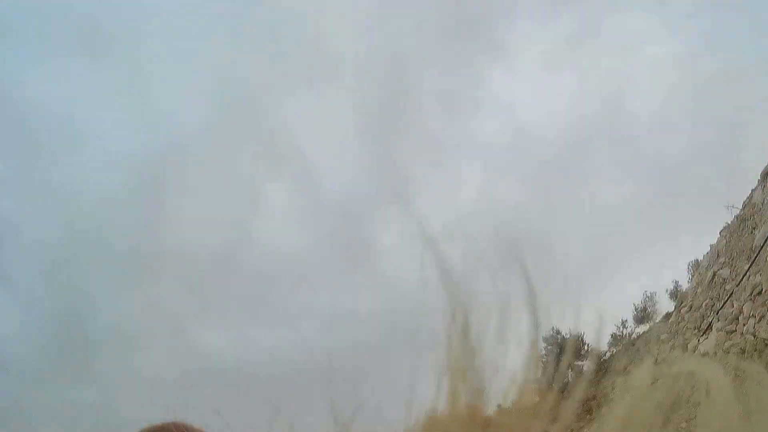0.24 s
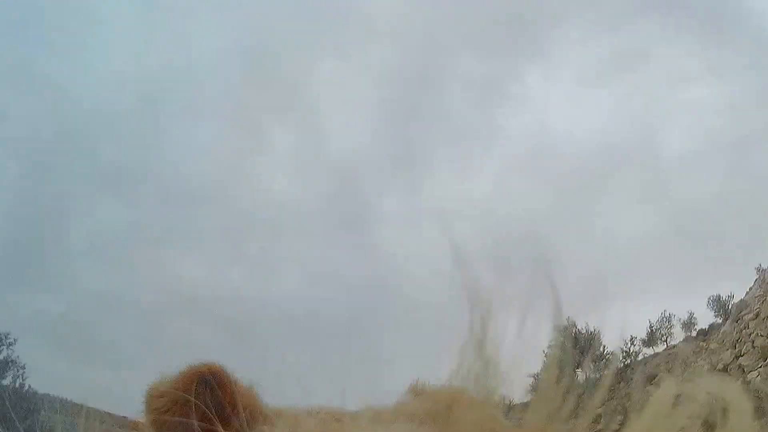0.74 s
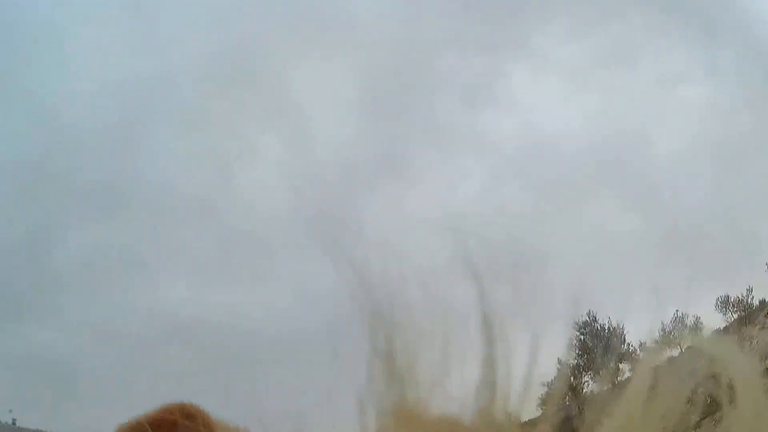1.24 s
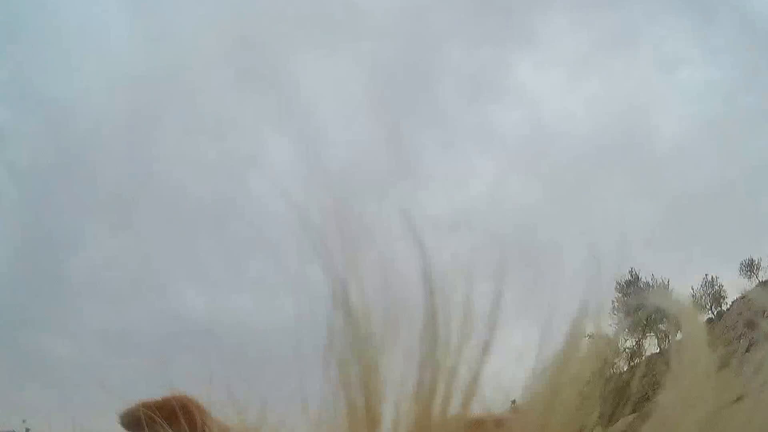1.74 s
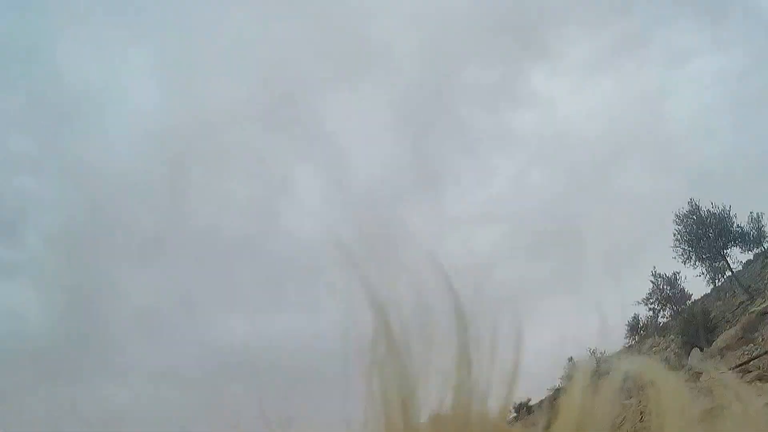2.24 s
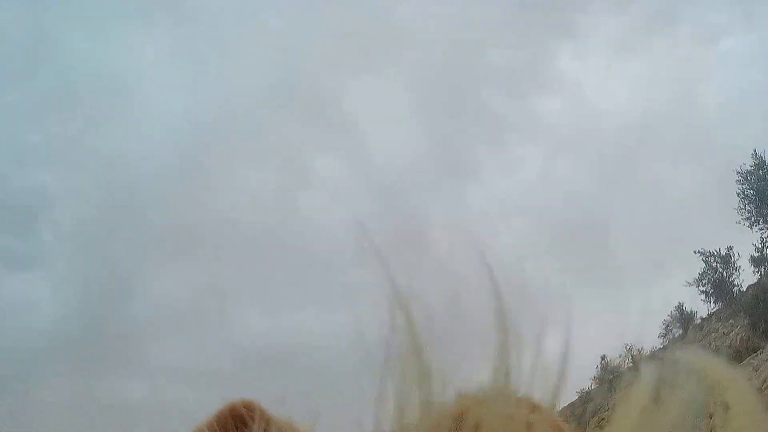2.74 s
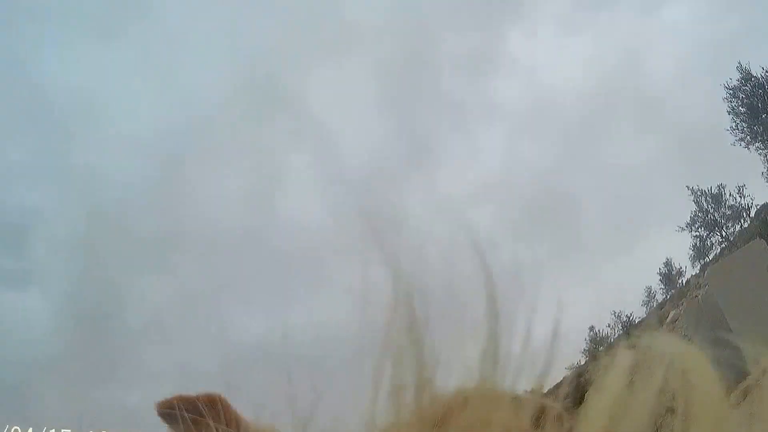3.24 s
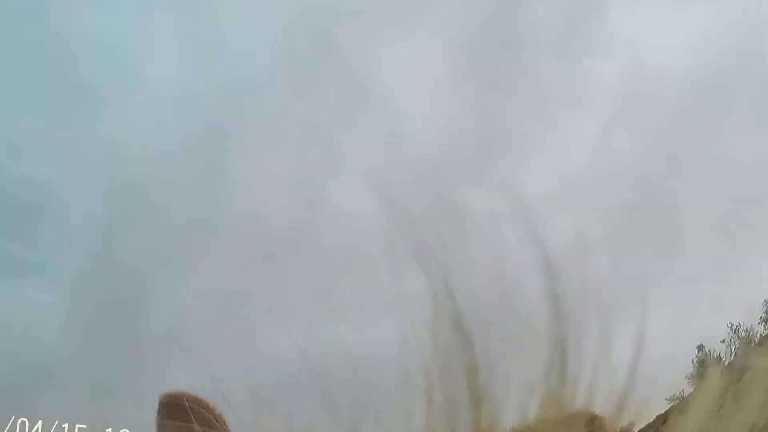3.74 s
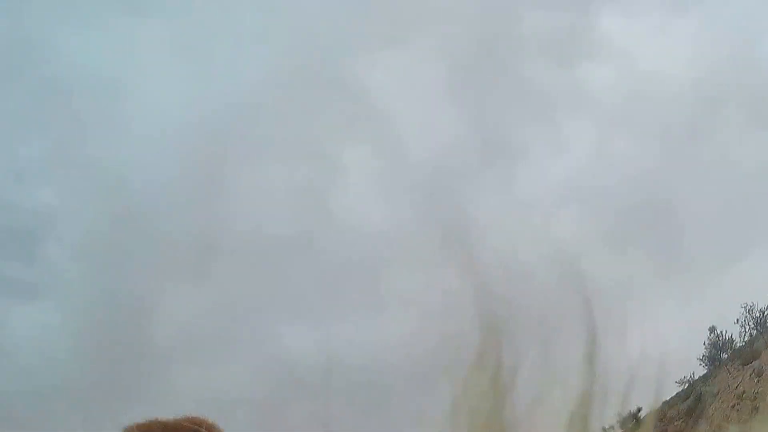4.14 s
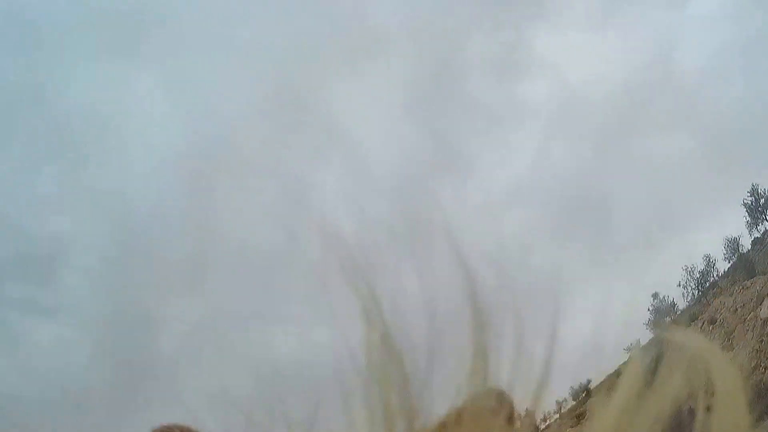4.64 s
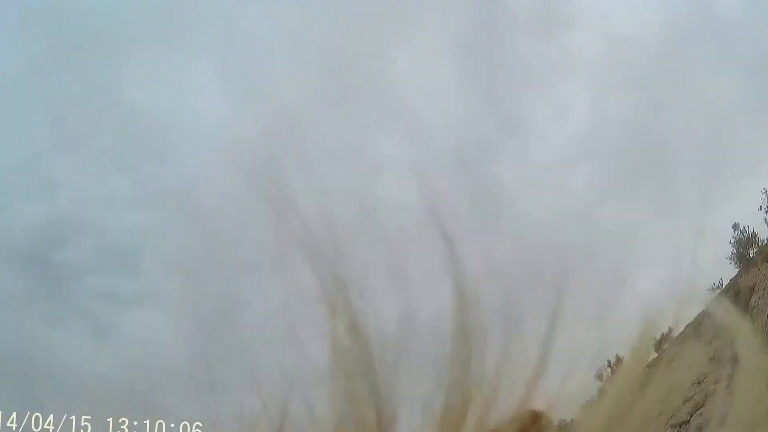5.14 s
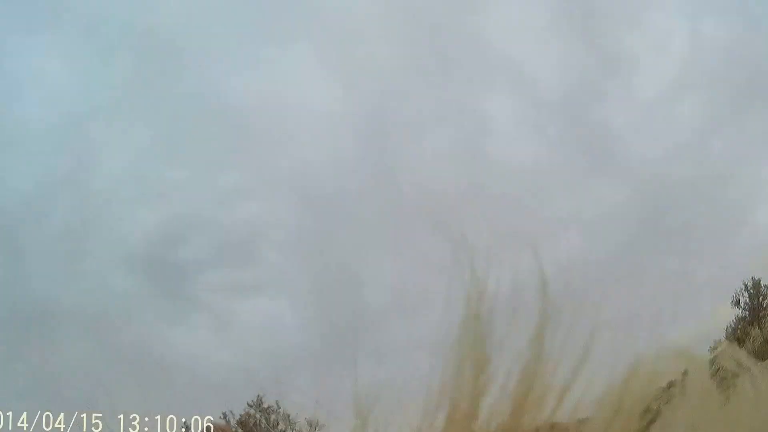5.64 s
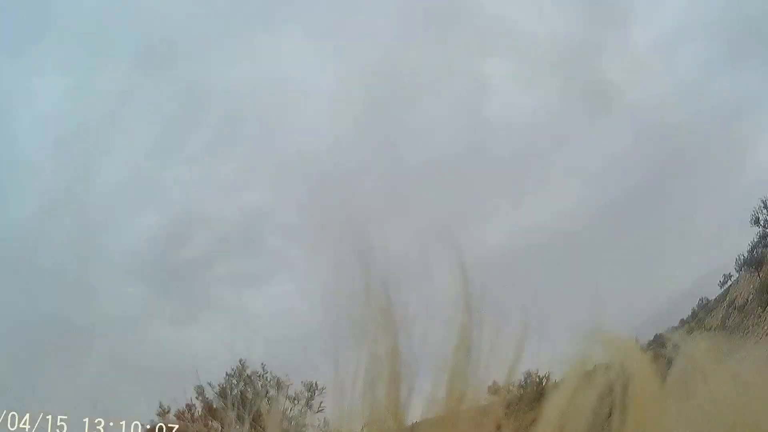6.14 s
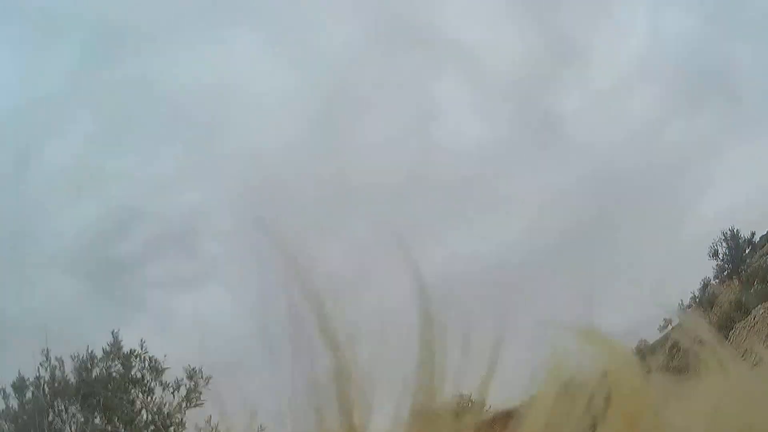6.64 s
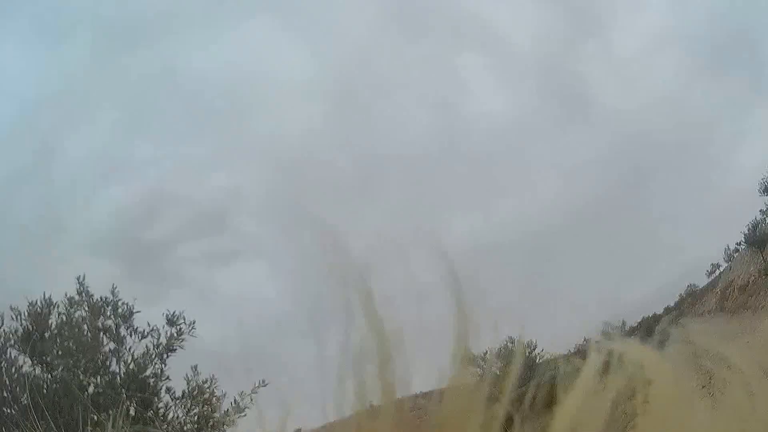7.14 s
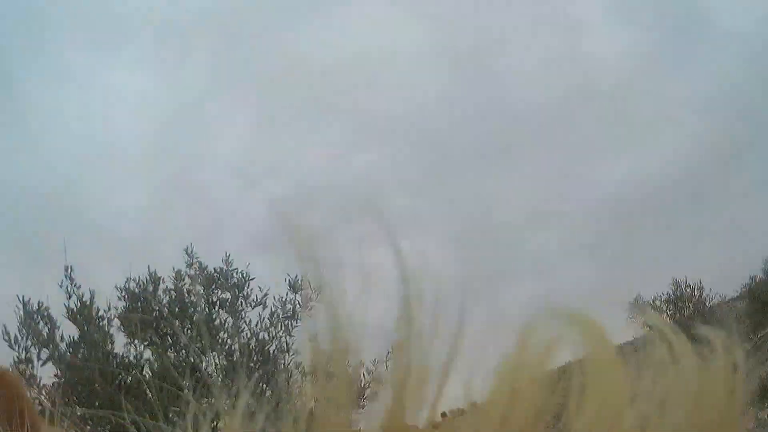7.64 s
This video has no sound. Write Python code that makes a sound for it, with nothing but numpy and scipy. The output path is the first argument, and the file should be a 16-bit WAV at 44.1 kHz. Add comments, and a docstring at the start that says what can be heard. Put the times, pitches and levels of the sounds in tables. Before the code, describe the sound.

Steady muffled thumps and scratchy swishes of fur and dry grass follow a dog's trot, slowing and softening near the end over faint hiss.

```python
"""A jolt, a knock and a swish of dry grass land together, then repeat with each stride of a trotting dog.
A small camera in a closed housing rides on its back: short swings make the jolts, ringing bursts the knocks,
swells of scratchy noise the grass and fur, and slow swings the sway; resonances of the housing colour
the rustle and knocks. Tiny ticks stand out, with low rumble, hiss, faint whine and thin tones behind."""
import sys
import numpy as np
from scipy import signal
from scipy.fft import rfft, irfft, next_fast_len
from scipy.io import wavfile
from scipy.ndimage import uniform_filter1d

SR = 44100
rng = np.random.default_rng(int(sys.argv[2]) if len(sys.argv) > 2 else 0)


def put_to_file(sound):
    """Save the sound as 16-bit audio at rate SR, in the file named by the first command-line argument."""
    columns = np.atleast_2d(sound).T  # one column per channel
    safe = np.clip(columns, -1, 1)
    whole_steps = np.round(safe * 32767)
    wavfile.write(sys.argv[1], SR, whole_steps.astype(np.int16))


N = 348390
SIZE = next_fast_len(N + SR // 2)  # padded for filtering
HZ = np.arange(SIZE // 2 + 1) * SR / SIZE + 1e-3  # just above zero, so logs stay finite
TIME = np.arange(N) / SR

# footfalls, the two diagonal leg pairs in turn: (peak time [s], swish level [dB], sway level [dB])
FOOTFALLS = [(0.041, -42.5, -38), (0.278, -44.5, -41), (.481, -41.5, -41), (0.718, -45.5, -40.5),
             (0.914, -39.5, -42.5), (1.157, -45, -37), (1.363, -41, -48), (1.588, -47, -45.5),
             (1.791, -39, -45), (2.033, -46.5, -45), (2.239, -41.5, -48), (2.468, -47, -43),
             (2.681, -45.5, -45.5), (2.908, -44, -46), (3.121, -41.5, -44.5), (3.366, -48, -43),
             (3.579, -44.5, -49), (3.811, -46.5, -44.5), (4.036, -42, -46.5), (4.281, -45.5, -41),
             (4.491, -43, -46), (4.737, -49.5, -43.5), (4.948, -46, -46), (5.197, -47.5, -40.5),
             (5.432, -45, -51), (5.673, -47, -50), (5.943, -48.5, -60), (6.205, -50, -54.5),
             (6.457, -46.5, -46), (6.728, -48.5, -46), (6.996, -48, -50), (7.249, -53.5, -50.5),
             (7.645, -56, -57)]
FIRST_GAP_S = .22  # time assumed before the first step
SWISH_PRESS = 0.85  # higher = flatter top
# per leg pair: rise and fall as shares of the time since the last step, treble under the swish
SWISH_RISE, SWISH_FALL = (0.1, 0.11), (0.099, .09)
SWISH_TREBLE_DB = (-11, -13.5)
# stray tufts brushing past: (peak time [s], level [dB], treble relative to it [dB])
TUFTS = [(.385, -54, -24), (.613, -55, -8), (.835, -61, -18), (1.049, -62, -8), (1.48, -58.5, -8),
         (1.717, -54.5, -11), (2.368, -60, -13), (3.03, -52, -18), (3.263, -51.5, -16), (4.408, -55.5, -11),
         (4.87, -50.5, -10), (5.033, -61, -13), (6.316, -58, -15), (6.851, -50.5, -12), (7.085, -56, -8),
         (7.4, -58, -15)]
TUFT_RISE_S, TUFT_FALL_S = 0.026, 0.016
# rustle between the swishes, before its random wavering: (time [s], level [dB])
RUSTLE_BED = [(0.0, -53.5), (.35, -57), (.61, -53.5), (1.49, -53.5), (2.53, -54.5), (2.88, -62),
              (3.08, -55.5), (4.47, -55), (4.99, -58.5), (5.2, -56.5), (5.97, -56), (6.16, -68),
              (6.36, -54), (6.73, -66), (6.89, -54), (7.5, -74.5), (7.77, -61), (7.9, -76)]
BED_TREBLE_DB, USUAL_BED_DB = -12, -57
# housing resonances under the dull and the bright scratches: (frequency [Hz], width [Hz], level [dB])
HOUSING_DULL = [(266, 290, -3.5), (635, 207, 0), (888, 135, -4.5), (1014, 32, -4.5), (1145, 220, -7),
                (1355, 320, -0.5), (1617, 450, -1.5), (1884, 350, -2.5), (2370, 280, -14.5),
                (2570, 390, -12)]
HOUSING_BRIGHT = [(3314, 230, -3.5), (3638, 304, 2.5), (4084, 225, -1), (4270, 180, -6), (4740, 250, -9.5),
                  (5050, 360, -11), (5550, 790, -14), (5900, 5400, -22), (9400, 340, -20),
                  (11100, 7400, -26.5)]

# the mount jolts on the harness: (peak time [s], drive level [dB], swing before wobble [Hz])
MOUNT_JOLTS = [(.027, -35.5, 171), (0.043, -37.5, 151), (0.09, -45, 115), (0.267, -31, 127),
               (.406, -42, 152), (.462, -39, 181), (.707, -36, 123), (0.806, -44, 146), (.832, -38.5, 141),
               (.9, -34.5, 185), (0.919, -37.5, 187.4), (0.96, -44.5, 119), (1.15, -29, 134.3),
               (1.286, -38, 127.5), (1.347, -36.5, 207), (1.581, -32, 110), (1.718, -35.5, 161.7),
               (1.801, -34, 217), (1.845, -44, 144), (2.026, -35.5, 148.4), (2.109, -47, 200),
               (2.157, -45, 150), (2.236, -34.5, 143), (2.277, -38.5, 139), (2.47, -31.5, 128.4),
               (2.593, -45, 140), (2.687, -39.5, 129.6), (2.902, -30.5, 135.8), (3.037, -36.5, 143.3),
               (3.104, -37, 183), (3.124, -36.5, 181), (3.171, -39.5, 133), (3.356, -31.5, 133.3),
               (3.501, -50, 127), (3.565, -41, 140), (3.812, -36.5, 143.4), (3.949, -37.5, 152),
               (4.023, -32.5, 198), (4.077, -38, 152), (4.278, -33.5, 114), (4.418, -42.5, 130),
               (4.502, -35.5, 146), (4.722, -35, 124.4), (4.784, -42, 136), (4.81, -46, 136),
               (4.83, -43, 132), (4.874, -39.5, 165), (4.951, -36, 136), (5.009, -40, 108.4),
               (5.195, -41.5, 149), (5.323, -50, 119), (5.413, -45, 196.5), (5.437, -40, 179.5),
               (5.481, -36.5, 108.4), (5.799, -46, 116.5), (5.947, -34.5, 139), (6.217, -45, 136),
               (6.343, -50, 127.4), (6.365, -41.5, 127), (6.437, -43, 162), (6.47, -35.5, 141),
               (6.754, -38.5, 126.3), (6.886, -45, 145.5), (6.92, -45, 142), (6.996, -42, 199),
               (7.068, -43.5, 200)]
JOLT_RISE_S, JOLT_FALL_S = .006, 0.0066
# faint jolts at random moments
JIGGLE_PER_S, JIGGLE_DB, JIGGLE_SCATTER_DB, JIGGLE_HZ = 2.6, -56.5, 3, (124, 185)
JIGGLE_END_S, MAX_JIGGLES = 7.1, 40
# rattling straps: (frequency [Hz], width [Hz], level [dB])
STRAP_MODES = [(283, 79, 0.44), (133.5, 103, -1.4)]

# knocks on the housing wall: (peak time [s], level [dB])
WALL_KNOCKS = [(.03, -36.5), (.269, -44), (.402, -47), (.457, -41), (.618, -54), (.706, -44), (.832, -43.5),
               (.903, -37.5), (.97, -55), (1.143, -37), (1.18, -43.5), (1.282, -53), (1.344, -42),
               (1.369, -45), (1.582, -41), (1.712, -48.5), (1.77, -49), (1.784, -38.5), (1.947, -50),
               (2.024, -41.5), (2.105, -49), (2.218, -37.5), (2.469, -40), (2.666, -38), (2.895, -45.5),
               (2.945, -51), (3.034, -42), (3.105, -38), (3.359, -43.5), (3.56, -45), (3.58, -52),
               (3.811, -45), (3.951, -47), (4.007, -43.5), (4.025, -37), (4.279, -43.5), (4.413, -47),
               (4.484, -36), (4.502, -45), (4.52, -45.5), (4.723, -49), (4.786, -51), (4.872, -45),
               (4.926, -43.5), (4.949, -39), (5.309, -49.5), (5.41, -44), (5.476, -47), (5.793, -42.5),
               (5.814, -47), (5.918, -48.5), (5.942, -36.5), (6.202, -52), (6.361, -45), (6.461, -44),
               (6.74, -51), (6.878, -46.5), (6.962, -44)]
# resonances of the wall: (frequency [Hz], width [Hz], level [dB])
WALL_MODES = [(632, 119, 1.5), (300, 260, -11.5), (1010, 310, -19)]
KNOCK_RISE_S, KNOCK_FALL_S = 0.0024, 0.0061
MURMUR_DB, MURMUR_FOLLOW = -64, 0.34  # at the usual rustle, before wavering; dB per dB of rustle

SWAY_LAG_S, SWAY_SPREAD_S = (-0.0307, .002), (.04, 0.0309)  # per leg pair
# colour of the low rumble: (frequency [Hz], level per Hz [dB])
RUMBLE_COLOUR = [(15, -4.5), (30, 0), (70, -3.5), (150, -5.5), (300, -9.5), (500, -14), (900, -38)]
# the rumble sinks as the dog slows, before its wavering: (time [s], level [dB])
RUMBLE_FADE = [(0.0, -55.5), (6.4, -55), (7.9, -56.5)]
RUMBLE_FOLLOW = 0.1  # dB per dB of rustle

# a small hard part ticks: (time [s], force before its resonances [dB])
TICK_BLOWS = [(0.044, -14.5), (0.479, -16), (0.9253, -24), (1.7987, -16), (2.2328, -26), (3.1073, -27),
              (3.8094, -35), (4.0397, -19)]
# resonances of the small part: (frequency [Hz], width [Hz], level [dB])
TICK_RING = [(10730, 540, 0), (9550, 500, -3), (11600, 900, -11), (13500, 3000, -17), (5900, 1800, -12)]

# colour of the preamp hiss: (frequency [Hz], level per Hz [dB])
HISS_COLOUR = [(100, 3), (1000, 15.5), (5000, 0.5), (9000, -2), (14000, -2), (15700, -7)]
HISS_DB = -60.5
# comb of whine: (frequency [Hz], level before wavering [dB])
WHINE_COMB = [(9337.6, -94), (9410.2, -92), (9482.9, -85), (9555.6, -85.5), (9628.1, -91), (9700.9, -93)]
# when the thin tones sound: (start time [s], end time [s])
THIN_TONE_SPANS = [(.21, .38), (1.2, 1.4), (5.37, 5.5), (6.28, 6.42), (6.48, 6.56)]
# the two thin tones, heard together: (frequency [Hz], level before wavering [dB])
THIN_TONES = [(11293, -82), (14116, -81.5)]
TOP_HZ = 15660


def rustle():
    """Grass and fur scratch in a bed, in swells at each leg swing and in stray brushes, through the housing."""
    low_power = undb(2 * (bed_db() + 2.0 * walk(14)))
    high_power = low_power * undb(2 * BED_TREBLE_DB)
    for at, db, treble_db, rise, fall in swishes() + tufts():
        i, _, shape = bell(at, rise, fall)
        shape = np.tanh(SWISH_PRESS * shape) / np.tanh(SWISH_PRESS)
        low_power[i] += undb(2 * db) * shape ** 2
        high_power[i] += undb(2 * (db + treble_db)) * shape ** 2
    patchy = undb(1.8 * walk(70))  # stalks catch and let go
    dull = unit(colour(grains(scatter_db=2.0), modes(HOUSING_DULL)))
    bright = unit(colour(grains(scatter_db=3.), modes(HOUSING_BRIGHT)))
    return patchy * (np.sqrt(low_power) * dull + np.sqrt(high_power) * bright)


def swishes():
    """Swells of the leg swings, longer when the steps are further apart."""
    gaps = np.diff([row[0] for row in FOOTFALLS], prepend=FOOTFALLS[0][0] - FIRST_GAP_S)
    rows = []
    for k, ((at, db, _), gap) in enumerate(zip(FOOTFALLS, gaps)):
        pair = k % 2
        rows.append((at, db, SWISH_TREBLE_DB[pair], gap * SWISH_RISE[pair], gap * SWISH_FALL[pair]))
    return rows


def tufts():
    """Swells of the stray tufts, all of one length."""
    return [(*row, TUFT_RISE_S, TUFT_FALL_S) for row in TUFTS]


def bed_db():
    """Level of the rustle between swishes, sample by sample."""
    return np.interp(TIME, *np.transpose(RUSTLE_BED))


def jolts():
    """Each jolt is a few uneven swings of the mount, a deeper thud of the back, and rattle from the straps."""
    out, rattle = np.zeros(N), np.zeros(N)
    wobble = walk(130)
    straps = unit(colour(grains(scatter_db=4.), modes(STRAP_MODES)))
    rows = MOUNT_JOLTS + jiggles()
    chances = rng.random((len(MOUNT_JOLTS) + MAX_JIGGLES, 2))
    for (at, db, hz), (phase, deep) in zip(rows, chances):
        i, t, shape = bell(at, JOLT_RISE_S, JOLT_FALL_S)
        turns = np.cumsum(hz * np.exp(0.257 * wobble[i])) / SR + phase
        # stiffer one way than the other
        swing = np.sin(2 * np.pi * turns) + 0.31 * np.sin(2 * np.pi * 1.9 * turns)
        thud = np.sin(2 * np.pi * ((60 + 45 * deep) * t + phase))
        out[i] += undb(db) * np.tanh(1.48 * shape) * swing
        out[i] += undb(db - 5.5) * shape ** 0.55 * thud
        rattle[i] += undb(db - 10.0) * shape ** 0.46
    return out + rattle * straps


def jiggles():
    """Rows of faint jolts at random moments while the dog trots."""
    gap, size, pitch = rng.random((MAX_JIGGLES, 3)).T
    at = np.cumsum(-np.log(1 - gap)) / JIGGLE_PER_S
    db = JIGGLE_DB + JIGGLE_SCATTER_DB * (2 * size - 1)
    hz = np.interp(pitch, (0, 1), JIGGLE_HZ)
    return [row for row in zip(at, db, hz) if row[0] < JIGGLE_END_S]


def knocks():
    """Short scuffed blows ring the housing wall; fur rubbing on it keeps it murmuring."""
    murmur_db = MURMUR_DB + MURMUR_FOLLOW * (bed_db() - USUAL_BED_DB)
    force = undb(murmur_db + 3.2 * np.tanh(0.6 * walk(35)))
    for at, db in WALL_KNOCKS:
        i, _, shape = bell(at, KNOCK_RISE_S, KNOCK_FALL_S)
        force[i] += undb(db) * shape
    return force * unit(colour(grains(scatter_db=1.9), modes(WALL_MODES)))


def sway():
    """One or two slow, uneven swings of pressure per stride, over a low rumble."""
    out, wobble = np.zeros(N), walk(30)
    chances = rng.random((len(FOOTFALLS), 2))
    for k, ((at, _, db), (pitch, phase)) in enumerate(zip(FOOTFALLS, chances)):
        spread = SWAY_SPREAD_S[k % 2]
        i, _, shape = bell(at + SWAY_LAG_S[k % 2], spread, spread)
        hz = (20 + 25 * pitch) * np.exp(0.31 * np.tanh(wobble[i]))
        turns = np.cumsum(hz) / SR + phase
        out[i] += undb(db) * shape * np.sin(2 * np.pi * turns)
    return out + rumble()


def rumble():
    """Low noise that wavers and slightly follows the rustle."""
    noise = unit(colour(rng.standard_normal(N), slope(RUMBLE_COLOUR)))
    db = np.interp(TIME, *np.transpose(RUMBLE_FADE)) + RUMBLE_FOLLOW * (bed_db() - USUAL_BED_DB)
    return undb(db + 4.1 * np.tanh(0.78 * walk(25))) * noise


def ticks():
    """A tiny blow and its rebound a millisecond later ring a small hard part."""
    force = np.zeros(N)
    for at, db in TICK_BLOWS:
        force[int(at * SR)] += undb(db)
        force[int((at + .0011) * SR)] += undb(db - 8)
    return colour(force, modes(TICK_RING))


def electronics():
    """Preamp hiss, a wavering comb of whine that fades near the end, and short thin tones."""
    hiss = undb(HISS_DB) * unit(colour(rng.standard_normal(N), slope(HISS_COLOUR)))
    whine = sum(tone(hz, db, rng.random()) for hz, db in WHINE_COMB)
    fade = np.clip((7.3 - TIME) / .4, 0, 1)
    whine = whine * undb(1.2 * walk(5) - .5) * fade
    on = sum((TIME > start) & (TIME < end) for start, end in THIN_TONE_SPANS)
    on = uniform_filter1d(1. * on, size=400)  # soft edges
    thin = sum(tone(hz, db, 0) for hz, db in THIN_TONES)
    return hiss + whine + on * undb(1.5 * walk(40)) * thin


def tone(hz, db, phase):
    """Steady sine at an rms level in dB; phase in turns."""
    return undb(db) * np.sqrt(2) * np.sin(2 * np.pi * (hz * TIME + phase))


def undb(db):
    """Amplitude from dB."""
    return 10 ** (np.asarray(db) / 20)


def unit(x):
    """Scale to rms 1."""
    return x / np.sqrt(np.mean(x ** 2))


def colour(x, gain):
    """Filter causally by a gain per frequency: the phase comes from the folded cepstrum."""
    cepstrum = irfft(np.log(gain + 1e-6), SIZE)
    cepstrum[1:SIZE // 2] *= 2
    cepstrum[SIZE // 2 + 1:] = 0
    return irfft(rfft(x, SIZE) * np.exp(rfft(cepstrum)), SIZE)[:N]


def modes(table):
    """Gain of steep resonances whose powers add."""
    power = 0
    for hz, width, db in table:
        detune = (HZ ** 2 - hz ** 2) / (HZ * width)
        power = power + undb(2 * db) / (1 + detune ** 2) ** 2
    return np.sqrt(power)


def slope(table):
    """Gain drawn through (frequency [Hz], level [dB]) points."""
    hz, db = np.transpose(table)
    return undb(np.interp(np.log(HZ), np.log(hz), db))


def walk(rate):
    """Random levels held 1 / rate s and slewed twice, trimmed to length and scaled to rms 1."""
    k = int(SR / rate)
    held = np.repeat(rng.standard_normal(N // k + 1), k)
    return unit(uniform_filter1d(uniform_filter1d(held, k), k)[:N])


def grains(scatter_db):
    """Dense scratches whose sizes scatter in dB."""
    return unit(rng.standard_normal(N) * undb(scatter_db * rng.exponential(size=N)))


def bell(at, rise, fall):
    """Samples, times and a bell-shaped envelope around a peak."""
    start = max(int((at - 4 * rise) * SR), 0)
    end = min(int((at + 4 * fall) * SR), N)
    i = np.arange(start, end)
    t = i / SR - at
    return i, t, np.exp(-.5 * (t / np.where(t < 0, rise, fall)) ** 2)


def scene():
    """Everything reaches one microphone."""
    return (rustle() + jolts() + knocks() + sway() + ticks() + electronics())[None]


def record(dry):
    """The recorder cuts the top with a steep low-pass."""
    return signal.sosfilt(signal.ellip(10, .2, 60, TOP_HZ, fs=SR, output="sos"), dry)


dry = scene()
out = record(dry)
put_to_file(out)
```